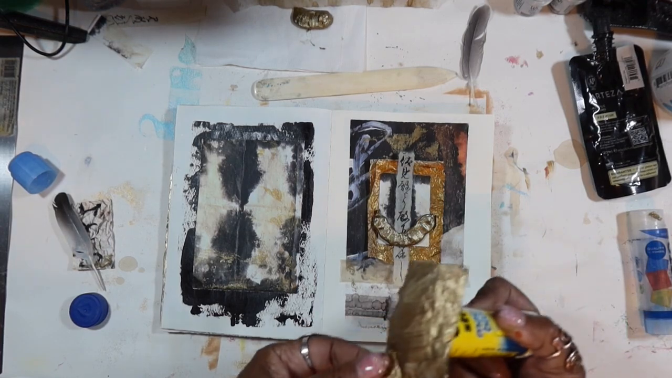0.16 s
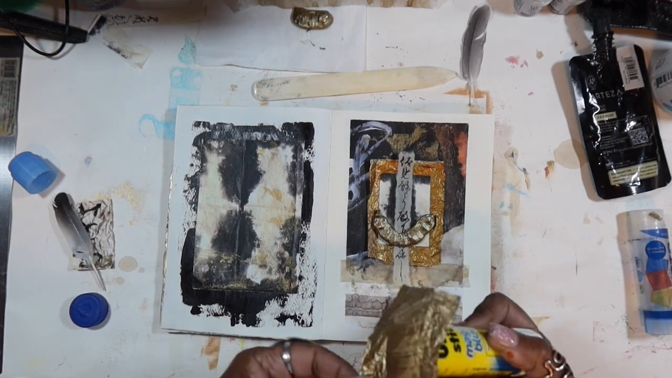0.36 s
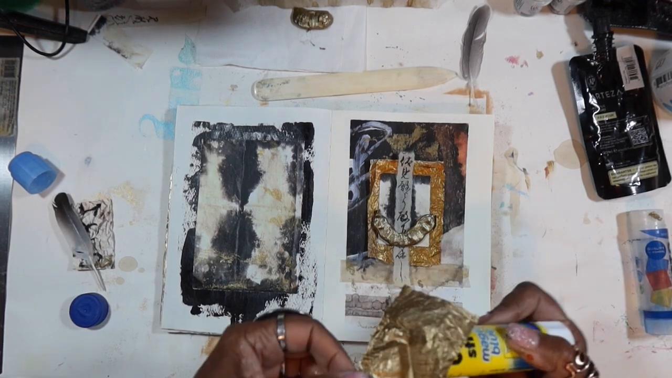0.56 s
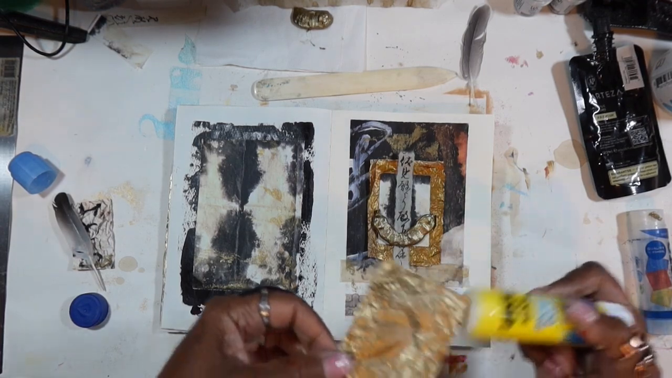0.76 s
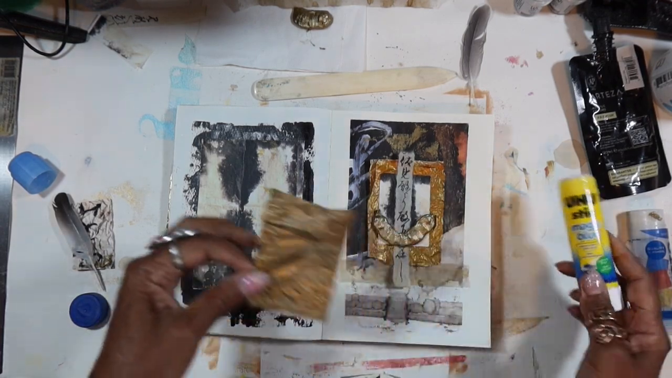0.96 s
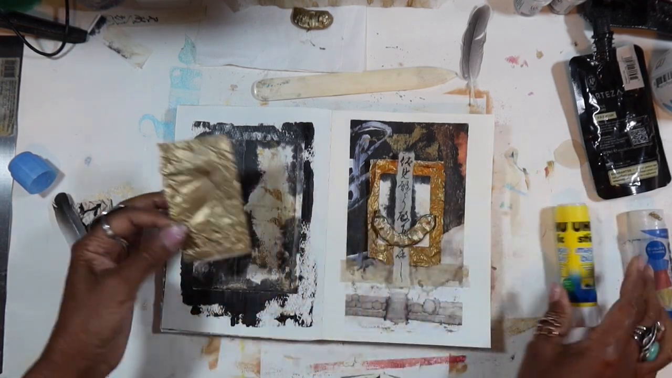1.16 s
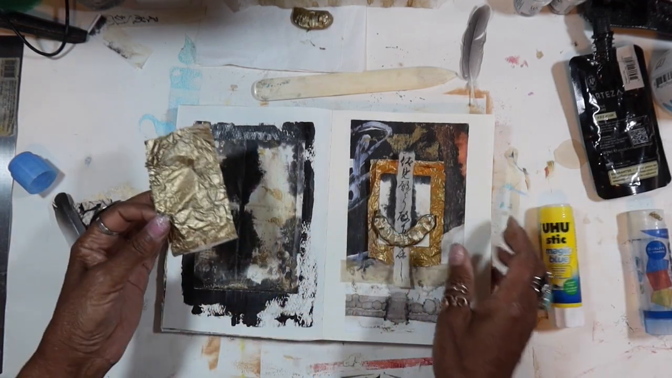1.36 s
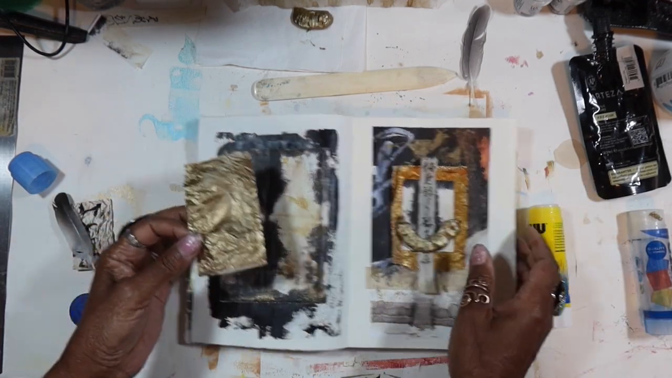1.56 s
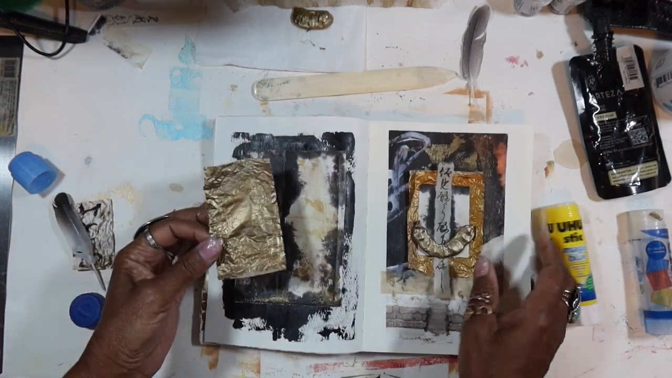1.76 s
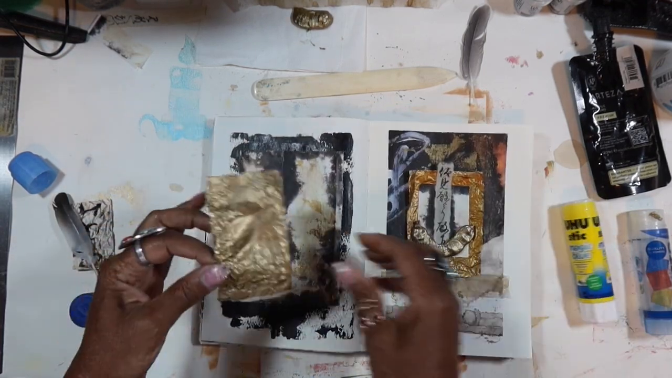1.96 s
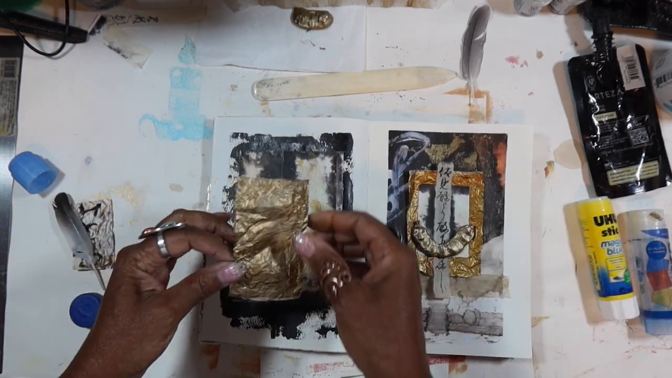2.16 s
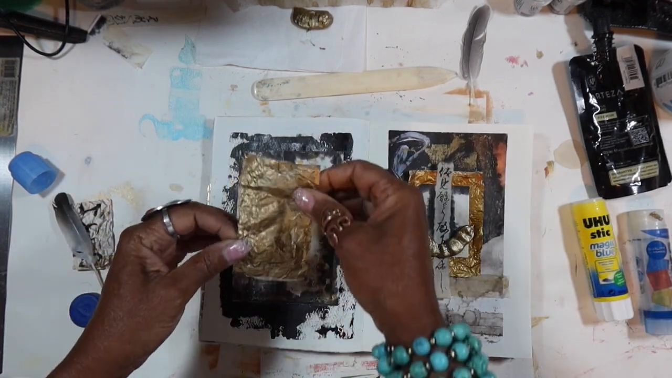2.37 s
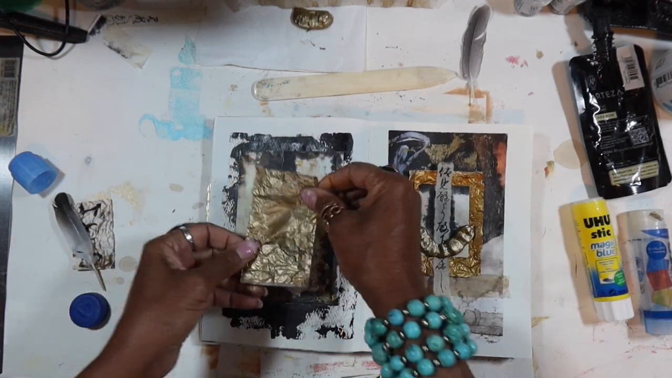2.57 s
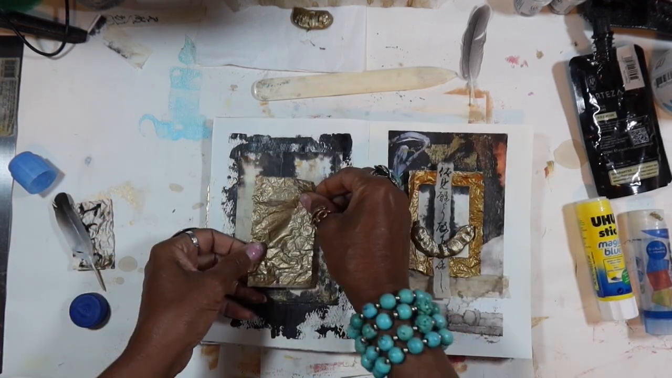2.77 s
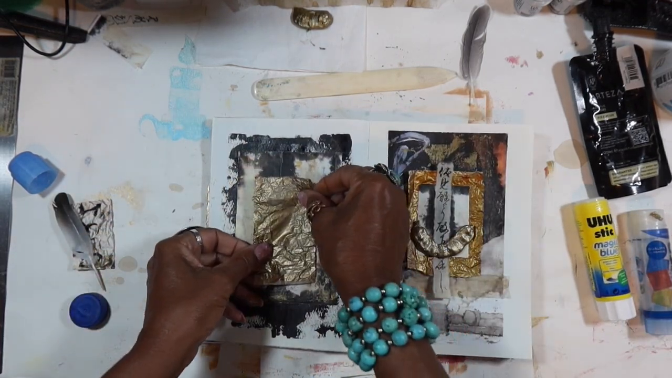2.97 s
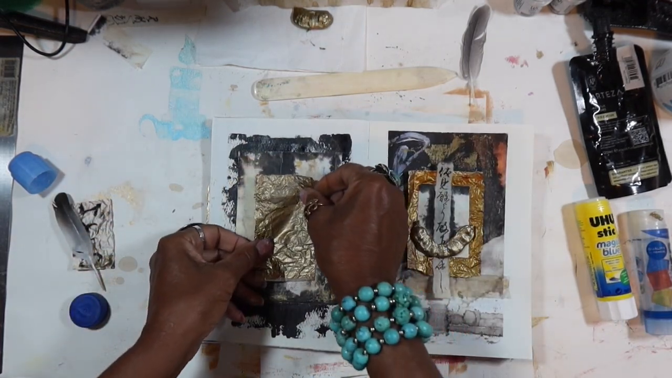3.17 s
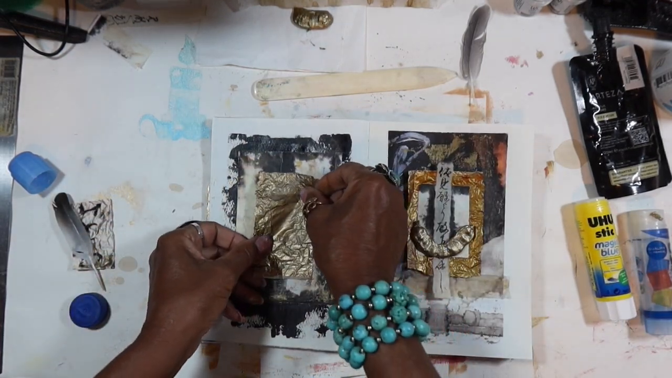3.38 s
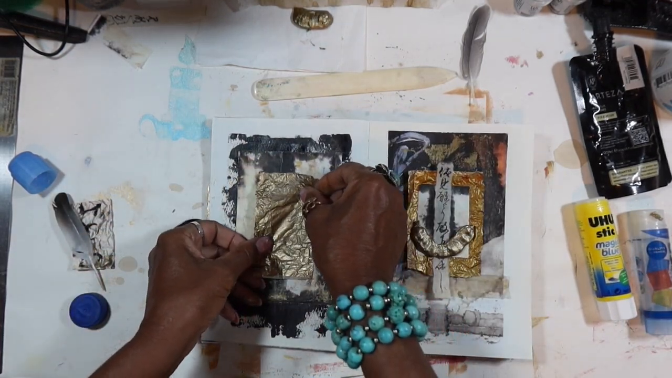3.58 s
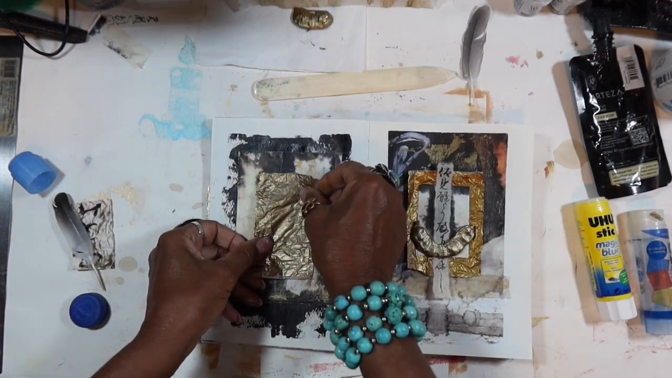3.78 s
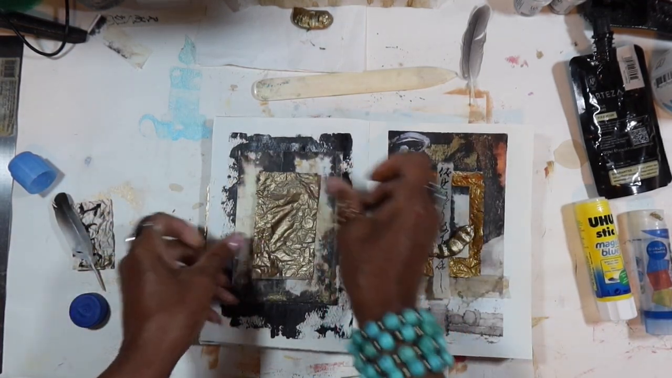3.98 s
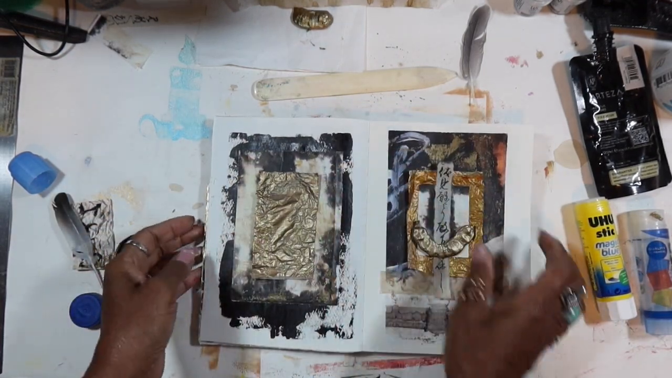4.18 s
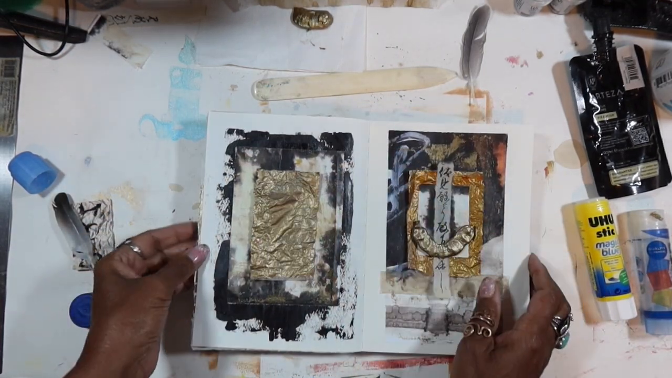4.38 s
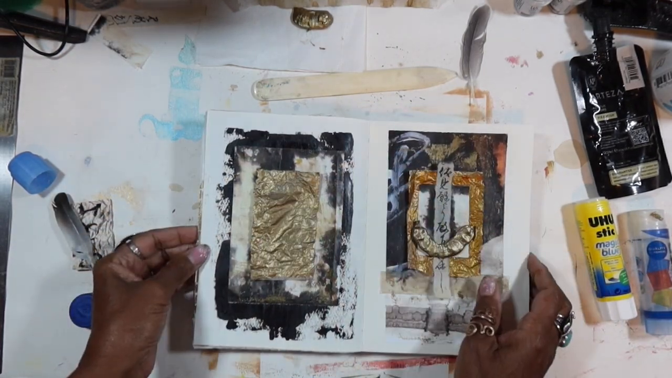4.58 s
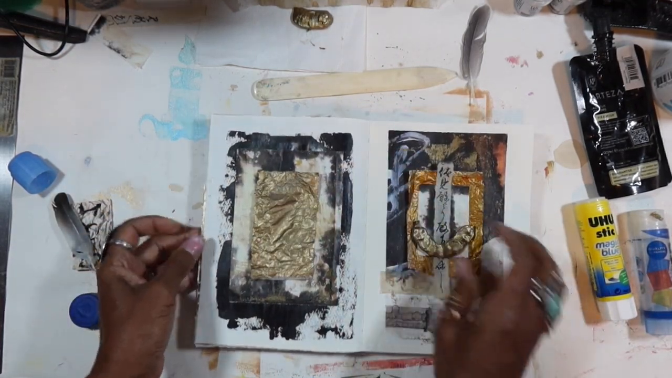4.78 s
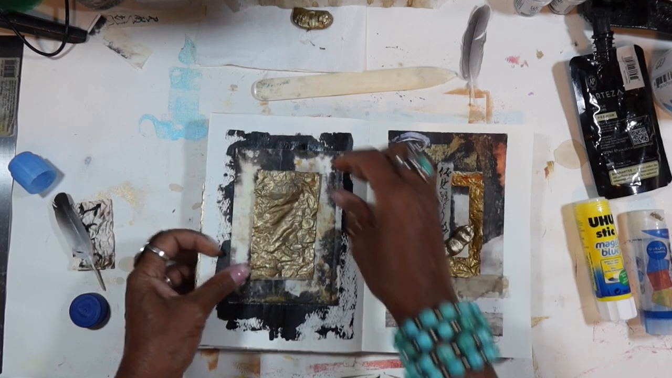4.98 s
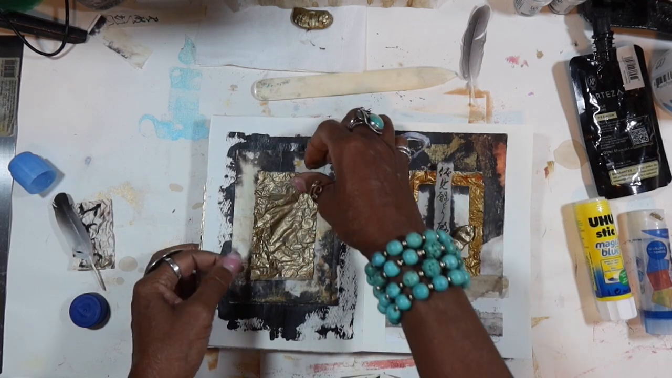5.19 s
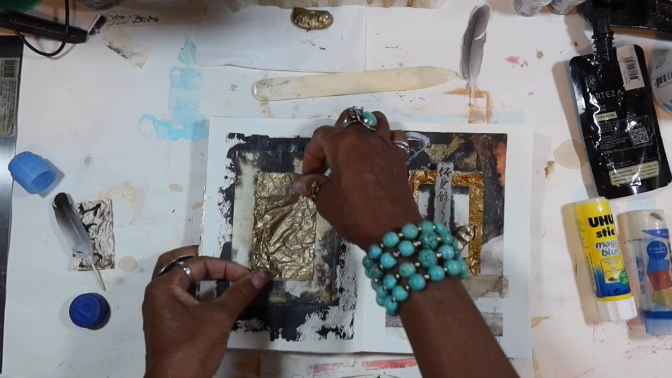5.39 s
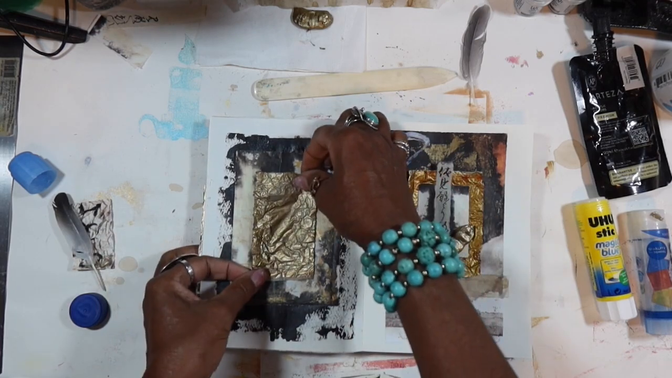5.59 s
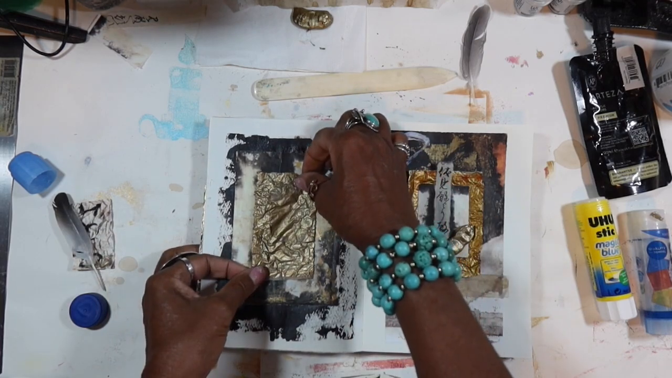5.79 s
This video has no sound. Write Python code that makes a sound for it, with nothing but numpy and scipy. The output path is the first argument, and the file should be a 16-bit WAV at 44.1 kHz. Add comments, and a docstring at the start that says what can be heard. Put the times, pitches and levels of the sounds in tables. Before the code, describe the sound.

Soft crackles of crinkled foil and dull finger rubs on paper, with one loud tabletop knock early on, over faint room hum and hiss.

```python
"""First, soft finger strokes on crinkled foil, in a small room whose faint hum, rumble and hiss come up gently.
The foil peels off a glue stick in quickening snaps; then the stick lands on the craft table with a thud and clack,
a sketchbook is nudged along the top, the foil is smoothed onto a page and a hand drops onto the table.
Blows ring table modes and hard resonances, slips of noise make rubbing, short decaying tones make snaps.
The microphone is on a camera mounted overhead."""
import sys
import numpy as np
from scipy import signal
from scipy.fft import rfft, irfft, next_fast_len
from scipy.io import wavfile
from scipy.ndimage import map_coordinates

SR = 44100
rng = np.random.default_rng(int(sys.argv[2]) if len(sys.argv) > 2 else 0)


def store_wav(level_fs):
    """Save 16-bit WAV to argv[1]."""
    pcm = np.round(np.clip(np.atleast_2d(level_fs), -1, 1) * 32767)
    wavfile.write(sys.argv[1], SR, pcm.T.astype(np.int16))


N = 257544


def amp(db):
    """Decibels to gain."""
    return 10 ** (np.asarray(db) / 20)


def unit(x):
    """Scale to rms 1."""
    return x / np.sqrt(np.mean(x ** 2) + 1e-20)


def along(points, hz):
    """Read (f/Hz, value) points on a log frequency axis."""
    f, v = np.transpose(points)
    return np.interp(np.log(hz + 1), np.log(f + 1), v)


def wobble(rate):
    """A smooth random curve, rate knots a second."""
    knots = rng.standard_normal(int(N * rate / SR) + 4)
    return map_coordinates(knots, [np.arange(N) * rate / SR])


def filtered(x, response):
    """Multiply the spectrum of x by a response of frequency."""
    size = x.shape[-1]
    m = next_fast_len(size + 8192)
    return irfft(rfft(x, m) * response(np.fft.rfftfreq(m, 1 / SR)), m)[..., :size]


def coloured(x, spectrum):
    """Shape x by (f/Hz, level/dB) points, at rms 1."""
    return unit(filtered(x, lambda hz: amp(along(spectrum, hz))))


# stereo image of sounds from the table: f/Hz, left-right likeness [0-1]
TABLE_LIKENESS = [(100, .995), (300, .985), (600, .96), (1200, .87), (2500, .77), (5000, .55), (10000, .2)]


def spread(pair, likeness=TABLE_LIKENESS):
    """Two unrelated signals become left and right, as alike as the likeness points say."""
    def mid_side_gains(hz):
        turn = np.arccos(np.clip(along(likeness, hz), -1, 1)) / 2
        return np.array([np.cos(turn), np.sin(turn)])

    mid, side = filtered(pair, mid_side_gains)
    return np.array([mid + side, mid - side])


def add(track, s, sound):
    """Mix a sound into a track at time s."""
    part = track[..., max(round(s * SR), 0):][..., :sound.shape[-1]]
    part += sound[..., :part.shape[-1]]


def grains(size, rate, scatter_db, smooth):
    """Tiny slips of uneven strength at random moments, over a share of smooth friction noise."""
    strengths = amp(scatter_db * np.clip(rng.standard_normal(size), -2, 2))
    slips = (rng.random(size) < rate / SR) * strengths
    rough = unit(slips * rng.standard_normal((2, size)))
    return unit(rough + smooth * rng.standard_normal((2, size)))


# low room noise: f/Hz, level/dB per Hz
RUMBLE_COLOUR = [(15, -27), (38, -9), (60, -2), (115, -2.5), (175, -6.5), (250, -3), (310, -4.5),
                 (380, -5.5), (600, -12.5), (900, -17), (1400, -41)]
# high room noise: f/Hz, level/dB per Hz
HISS_COLOUR = [(410, -9), (700, -2), (957, -3), (1150, -1), (1450, -3), (3300, -8), (5860, -13.5),
               (10700, -23.5), (14400, -35.5), (15800, -56)]
# steady tones of the room: f/Hz, level/dB against the rumble
HUM_TONES = [(54, -14.5), (120, -14), (274.5, -9)]
# stereo image of the room tone: f/Hz, left-right likeness [-1 to 1]
AIR_LIKENESS = [(60, 1), (130, 0.62), (290, -0.26), (640, -0.1), (1410, 0.15), (3100, 0.48), (6820, 0.63),
                (15000, 0.33)]
RUMBLE_DB, HISS_DB = -51.5, -55
AIR_LOW_DB, AIR_RISE_S = -5, (0.18, 1.47)  # starts this much lower and comes up between these times


def room_tone(flutter_db=1.82):
    """Low rumble with a faint, slightly unsteady hum, and a fluttering hiss; all come up gently at first."""
    t = np.arange(N) / SR

    def waver():
        return 0.3 * wobble(4)

    hum = sum(amp(db + 2 * waver()) * np.sqrt(2) * np.sin(2 * np.pi * hz * t + waver())
              for hz, db in HUM_TONES)
    rumble = spread(coloured(rng.standard_normal((2, N)), RUMBLE_COLOUR), AIR_LIKENESS) + hum
    hiss = spread(coloured(rng.standard_normal((2, N)), HISS_COLOUR), AIR_LIKENESS)
    hiss_gain = amp(HISS_DB + flutter_db * wobble(5.13))
    rise_db = np.interp(t, AIR_RISE_S, [AIR_LOW_DB, 0])
    return amp(rise_db) * (amp(RUMBLE_DB) * rumble + hiss_gain * hiss)


# how long the small room rings: f/Hz, t60/s
ROOM_DECAY = [(100, 0.17), (400, 0.16), (2000, 0.19), (6000, 0.15), (14000, 0.4)]


def room(x, delay=0.006):
    """The walls answer after a short delay (s) with a diffuse tail; the highest treble lingers longest."""
    hz, t, z = signal.stft(rng.standard_normal((2, SR // 2)), SR, nperseg=256)
    decay = amp(-60 * t / along(ROOM_DECAY, hz)[:, None])
    tail = spread(signal.istft(z * decay, SR, nperseg=256)[1])
    late = np.pad(x, (round(delay * SR), 0))
    return signal.fftconvolve(late[None], tail / np.linalg.norm(tail[0]), axes=1)[:, :N]


# drag of the sketchbook cover: f/Hz, level/dB per Hz
COVER_COLOUR = [(120, -48), (200, -12), (345, -10), (407, -1), (454, -4), (607, -6), (798, -12.5),
                (1170, -9), (1680, -12), (1950, -13), (11400, -30), (15500, -38)]
SLIDE_S, SLIDE_DB = 1.595, -39.5  # moment and level of the fastest motion
SLIDE_RISE_S, SLIDE_FALL_S, SLIDE_ROUND = 0.071, 0.095, 2  # speeding up, slowing; 1 = pointed top, 2 = round


def book():
    """The cover drags over the paper-covered table in dense little slips, speeding up and coming to rest."""
    t = np.arange(N) / SR - SLIDE_S
    speed = np.exp(-np.abs(t / np.where(t < 0, SLIDE_RISE_S, SLIDE_FALL_S)) ** SLIDE_ROUND)
    drag = coloured(grains(N, rate=2600, scatter_db=0.5, smooth=1.0), COVER_COLOUR)
    return amp(SLIDE_DB) * speed * spread(drag)


FACET_HZ, FACET_OCTAVES = 2800, 0.28  # typical pitch of a flexing facet of foil, and its scatter


def facet():
    """The pitch (Hz) of one randomly chosen facet of the foil."""
    return FACET_HZ * 2 ** (FACET_OCTAVES * np.clip(rng.standard_normal(), -2, 2))


# finger strokes on the foil: middle t/s, half length t/s, crinkle level/dB,
# brightness [dB per octave], page rub level/dB
FINGER_STROKES = [(.01, 0.057, -61, -6, -52.5), (.12, 0.013, -60, 7, -83), (.462, 0.041, -56.5, -3.5, -82),
                  (.68, 0.093, -62.5, -1.5, -59.5), (0.754, 0.0074, -49.5, 9, -53),
                  (0.909, .06, -56, -3, -74), (1.82, 0.097, -59.5, -.5, -55),
                  (2.305, 0.035, -56.5, 1, -51.5), (2.386, 0.034, -57, 3.5, -47.5),
                  (2.534, 0.039, -48.5, 2.5, -49), (2.684, 0.044, -58, 1, -72), (3.412, 0.03, -65, 10, -68),
                  (3.906, 0.058, -52.5, 2, -57), (4.104, .033, -52.5, 5, -43),
                  (4.205, 0.029, -52.5, 5, -40.5), (4.324, 0.066, -50.5, -2, -59),
                  (4.426, .028, -55, -5.5, -61), (4.752, 0.063, -62, 3, -56), (5.075, 0.082, -57.5, 0, -59),
                  (5.315, 0.039, -55, -1.5, -75), (5.427, 0.062, -56, 1.5, -54.5)]
# crinkling foil: f/Hz, level/dB per Hz
FOIL_COLOUR = [(300, -23), (900, -5.5), (1700, 4), (3200, -3.5), (5500, -3.5), (9000, -11.5), (15000, -23)]
# the page rubbing underneath: f/Hz, level/dB per Hz
PAGE_COLOUR = [(50, -26), (110, 9), (280, -4), (420, 3.5), (620, 2.5), (900, -9.5), (2000, -9), (6000, -54)]


def strokes(facet_db=4, ripple_db=5.9):
    """Under each stroke the foil's creases crackle through its facets, and the page beneath rubs dully."""
    out, t = np.zeros((2, N)), np.arange(SR // 2) / SR
    hz = np.geomspace(100, 16000, 70)
    for s, length, crinkle_db, bright_db, rub_db in FINGER_STROKES:
        start = max(s - 2 * length, 0)
        pressure = np.exp(-2 * np.abs((t + start - s) / length) ** 2.6)
        octaves = np.log2(hz / facet())
        # one facet flexes most; the many small ones ripple the colour anew with each grip
        facets = facet_db * np.exp(-10 * octaves ** 2) + ripple_db * rng.standard_normal(len(hz))
        colour = np.column_stack([hz, along(FOIL_COLOUR, hz) + bright_db * octaves + facets])
        crinkle = coloured(grains(len(t), rate=1600, scatter_db=3, smooth=0.7), colour)
        rub = coloured(rng.standard_normal((2, len(t))), PAGE_COLOUR)
        add(out, start, pressure * (amp(crinkle_db) * crinkle + amp(rub_db) * rub))
    return spread(out)


# a crease giving way: f/Hz, level/dB
CRACK_COLOUR = [(300, 3), (1500, 1), (3200, 4), (5500, 0.5), (9000, -4.5), (15000, -18)]
RING_CYCLES, CRACK_T60 = 30, 0.026  # cycles, and seconds, to fall by 60 dB


def snaps(rows):
    """A snap is a broad crack and a few cycles of ring from the piece that moved."""
    out, t = np.zeros((2, N)), np.arange(SR // 20) / SR
    for s, db, hz, crack_db in rows:
        ring = np.sin(2 * np.pi * hz * t) * amp(-60 * t * hz / RING_CYCLES)
        crack = spread(coloured(rng.standard_normal((2, len(t))), CRACK_COLOUR))
        crack = crack * amp(-60 * t / CRACK_T60)
        add(out, s, amp(db) * (ring + amp(crack_db) * crack))
    return out


def creases(count=2, over_db=7, scatter_db=2.5, crack_db=-5):
    """Snap rows for the few weak creases that give way at random under each stroke."""
    return [(s + length * rng.uniform(-1, 1),
             crinkle_db + over_db + scatter_db * rng.standard_normal(), facet(), crack_db)
            for s, length, crinkle_db, _, _ in FINGER_STROKES for _ in range(count)]


PEEL_START_S, PEEL_LENGTH_S, PEEL_EASE = 0.5875, 0.161, 0.56  # ease under 1 = ever faster
PEEL_DB, PEEL_CRACK_DB, PEEL_SHARPENS_DB = -48.5, -2, 4  # each ring, its crack at first, the crack's growth


def peel(count=9, jitter_s=0.003):
    """Snap rows for the foil leaving the glue: creases let go ever faster and more sharply."""
    return [(PEEL_START_S + PEEL_LENGTH_S * done ** PEEL_EASE + jitter_s * rng.standard_normal(),
             PEEL_DB, facet(), PEEL_CRACK_DB + PEEL_SHARPENS_DB * done)
            for done in np.linspace(0, 1, count)]


# hard plastic and finger rings on the table: f/Hz, width f/Hz, level/dB
HARD_RESONANCES = [(770, 153, 17.5), (1280, 123, 20), (1600, 770, 17.5), (2200, 474, 22.5), (2730, 790, 17),
                   (3300, 480, -13), (4900, 900, 3.5), (5480, 380, 9), (9300, 830, -22)]


def clack(edge_hz, chatter_share=0.83, chatter_t60=0.024, bending=0.0525):
    """A hard contact with a little chatter rings the plastic; energy 1."""
    t = np.arange(SR // 20) / SR
    shell = sum((-1) ** k * amp(db) * width * np.exp(-np.pi * width * t) * np.cos(2 * np.pi * hz * t)
                for k, (hz, width, db) in enumerate(HARD_RESONANCES))
    chatter = rng.standard_normal(len(t)) * amp(-60 * t / chatter_t60)
    contact = (t == 0) + chatter_share * chatter / np.linalg.norm(chatter)
    ring = signal.fftconvolve(shell, contact)
    # bending waves: the treble arrives first
    ring = filtered(ring, lambda hz: np.exp(-2j * np.pi * bending * np.sqrt(hz)))
    ring = signal.sosfilt(signal.butter(4, min(edge_hz, SR / 3), fs=SR, output="sos"), ring)
    return ring / np.linalg.norm(ring)


# blows on the table: t/s, thud level/dB, hard clack level/dB, clack upper edge f/Hz
TABLE_BLOWS = [(1.1275, 5, -7, 4700), (1.152, -7, 5, 12900), (1.1707, -2, -6.5, 2940),
               (1.205, -16.5, -15.5, 3000), (1.224, -17, -37.5, 2000), (1.3203, -51, -8, 4650),
               (1.873, -41, -16, 7100), (4.1837, -29.5, -14, 4400), (4.2088, -25, -15.5, 2800),
               (4.2144, -29, -26.5, 9000)]
# modes of the table top: f/Hz, level/dB, t60/s
TABLE_MODES = [(57, -39, 0.13), (93, -17, 0.067), (124.8, -16.5, 0.18), (267, -2, 0.042),
               (450.4, -1.5, 0.04), (606, -8.5, 0.05), (865, -7.5, 0.043), (1120, -12, 0.092)]
# contact time when thud and clack are equal, and its power law: duller blows press longer
CONTACT_MS, CONTACT_SOFTENS = 1.077, 0.35


def blows(bass_hz=55):
    """Each blow pushes the table top for its contact time; hard contacts clack as well."""
    thuds, clacks, t = np.zeros(N), np.zeros(N), np.arange(SR // 2) / SR
    for s, thud_db, clack_db, edge_hz in TABLE_BLOWS:
        # neighbouring modes move the air in opposite directions; levels vary a little per blow
        top = sum((-1) ** k * amp(db + rng.normal(0, 0.52) - 60 * t / t60) * np.sin(2 * np.pi * hz * t)
                  for k, (hz, db, t60) in enumerate(TABLE_MODES))
        contact_ms = CONTACT_MS * amp(thud_db - clack_db) ** CONTACT_SOFTENS
        push = np.exp(-2 * (2 * t / (contact_ms / 1000) - 2) ** 2)
        thud = signal.fftconvolve(top, push / push.sum())[:len(t)]
        add(thuds, s, amp(thud_db) * thud)
        add(clacks, s, amp(clack_db) * clack(edge_hz))
    # the top radiates little below its lowest modes
    return signal.sosfilt(signal.butter(2, bass_hz, "high", fs=SR, output="sos"), thuds) + clacks


# the clearest snaps of foil, nails and the rocking tube: t/s, ring level/dB, ring f/Hz,
# crack level/dB against the ring
CLEAR_SNAPS = [(.7734, -36, 4900, -5), (.9632, -37, 2200, -16), (.9732, -36, 2500, -2),
               (1.322, -30.5, 1280, -18), (1.788, -38, 1830, -11), (2.3564, -43, 3000, -8),
               (2.4035, -42.5, 1780, -4.5), (2.5022, -44, 1840, -10), (3.098, -41, 1600, -9.5),
               (3.401, -41, 4200, -2), (3.934, -32, 2020, -3), (4.0815, -37.5, 1820, 0.5),
               (4.098, -48, 1510, 3), (4.3068, -33, 1950, -24), (4.3143, -38.5, 1250, -5.5),
               (4.4179, -40.5, 1830, -7), (4.5532, -31.5, 1820, -24), (5.09, -44.5, 815, -17),
               (5.2061, -38, 1990, -9), (5.508, -44, 770, -2.5)]
LEAD_S = 3e-5  # sound from the table reaches the left port this much sooner


def scene():
    """Knocks and snaps near the middle, with their room sound, over the rubbing and the room tone."""
    knocks, ticks = blows(), snaps(CLEAR_SNAPS + peel() + creases())
    # knock sound sent to the walls: f/Hz, level/dB
    scattered = [(120, -28), (250, -4.5), (600, -4), (850, -2.5), (2000, -10.5), (5500, -5.5), (8000, -17.5)]
    walls = filtered(knocks, lambda hz: amp(along(scattered, hz)))
    # left is earlier and slightly louder
    near = filtered(knocks, lambda hz: np.exp(np.array([[1j], [-1j]]) * np.pi * hz * LEAD_S))
    near = near * amp(np.array([[1], [-1]]) * 0.13)
    reverberant = room(walls + amp(-11.5) * ticks.mean(axis=0))
    return near + ticks + reverberant + strokes() + book() + room_tone()


TOP_HZ = 15600  # upper band limit of the camera


def record(dry):
    """The camera rounds off peaks at full scale and keeps almost nothing above its band limit."""
    held = dry / (1 + np.abs(dry) ** 8) ** (1 / 8)
    return filtered(held, lambda hz: 1 / (1 + (hz / TOP_HZ) ** 120))


dry = scene()
out = record(dry)
store_wav(out)
```